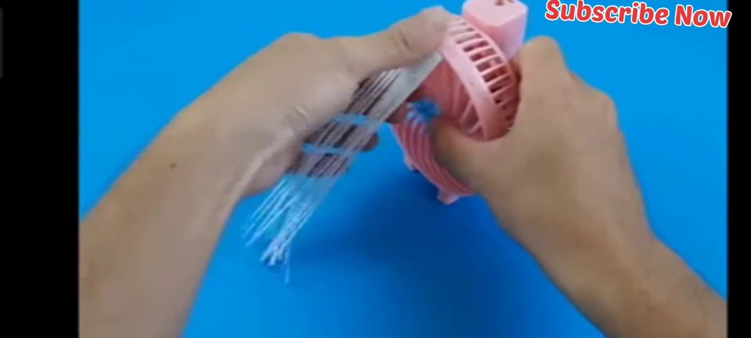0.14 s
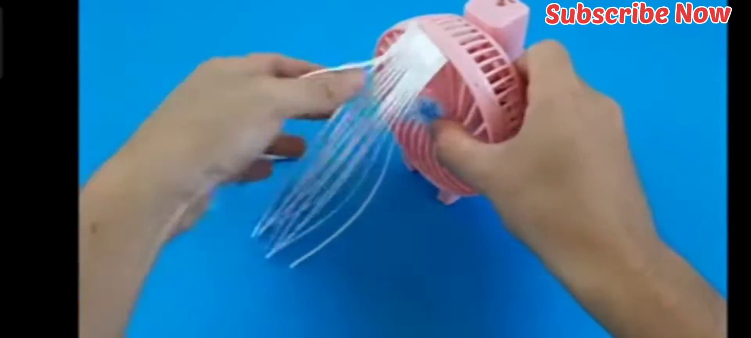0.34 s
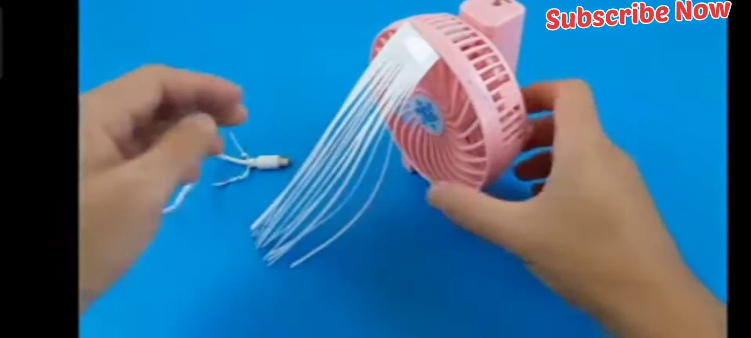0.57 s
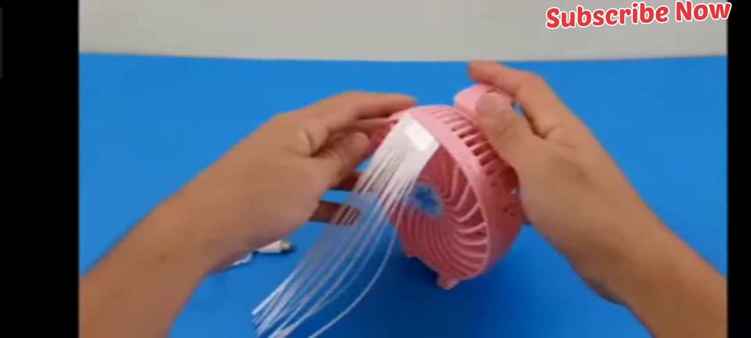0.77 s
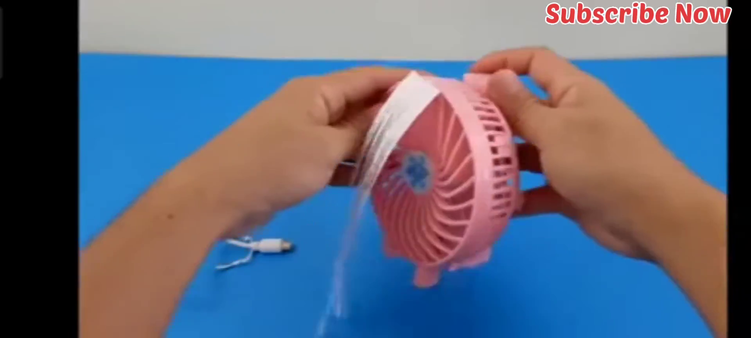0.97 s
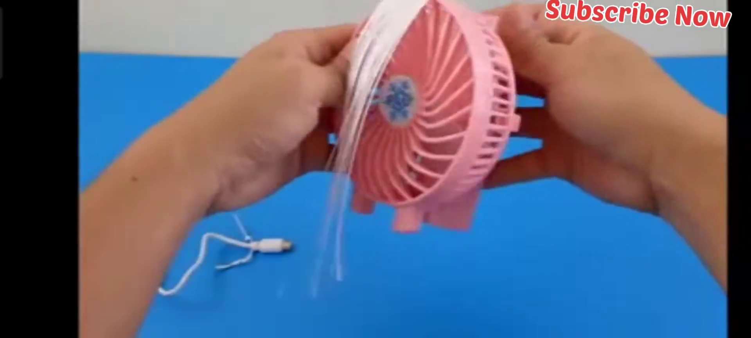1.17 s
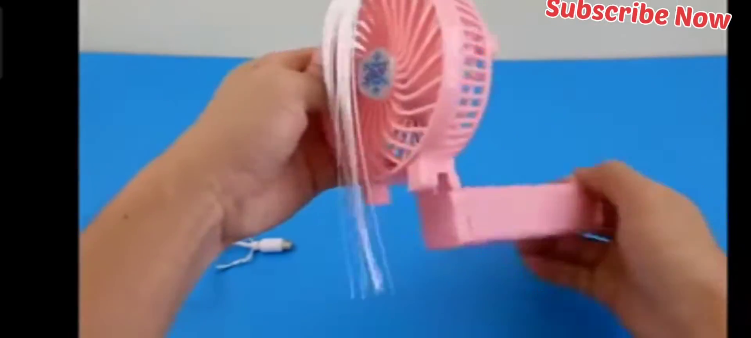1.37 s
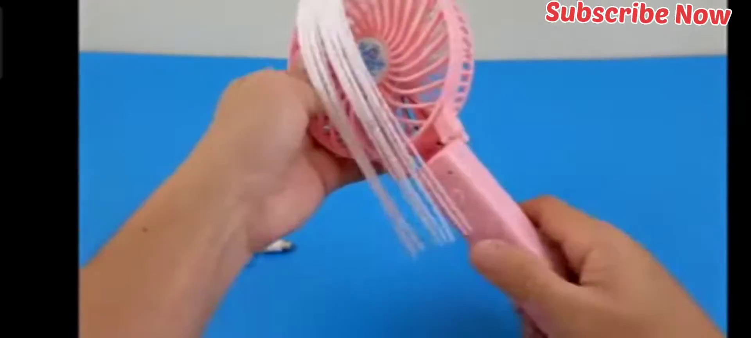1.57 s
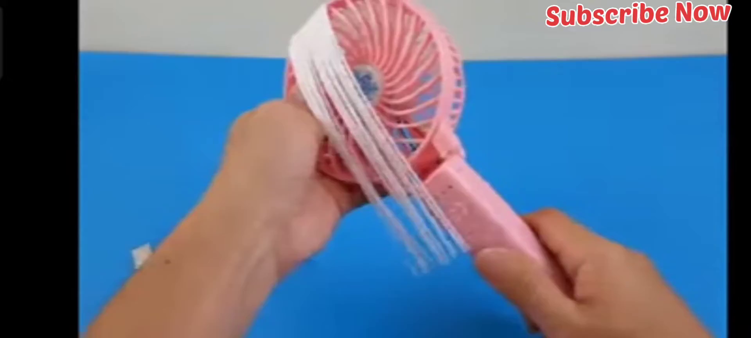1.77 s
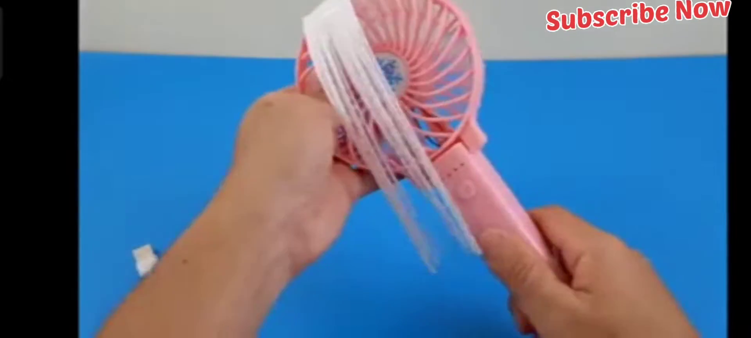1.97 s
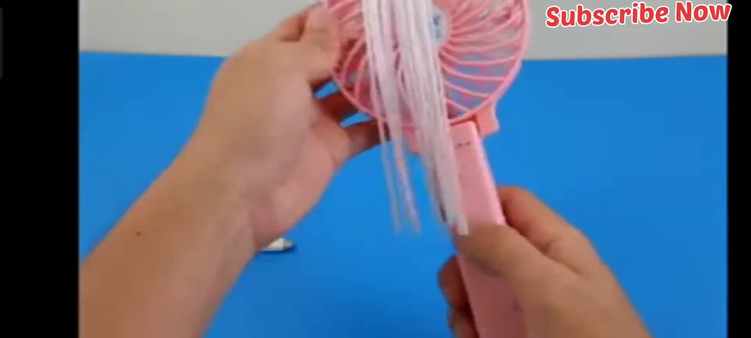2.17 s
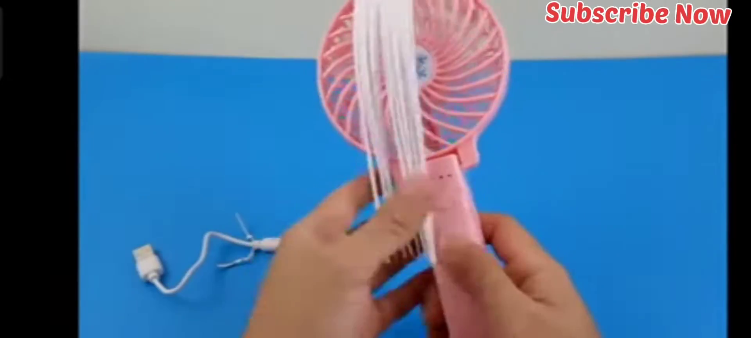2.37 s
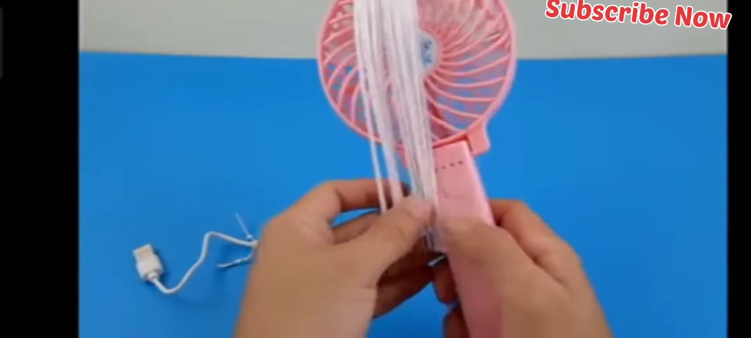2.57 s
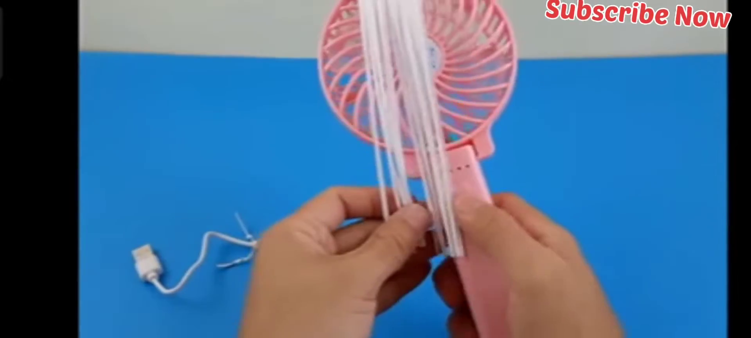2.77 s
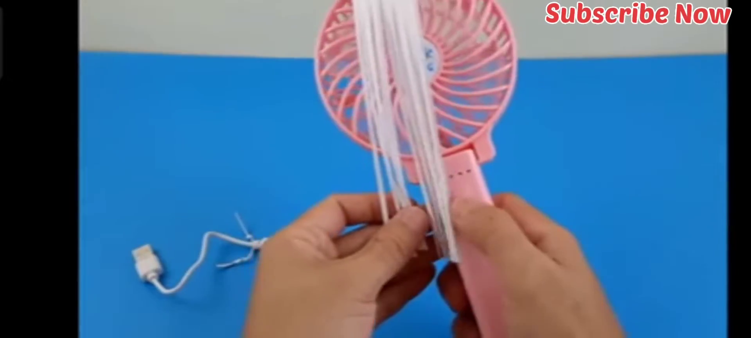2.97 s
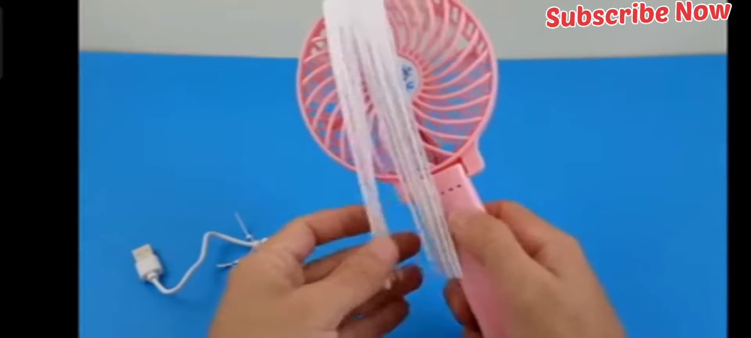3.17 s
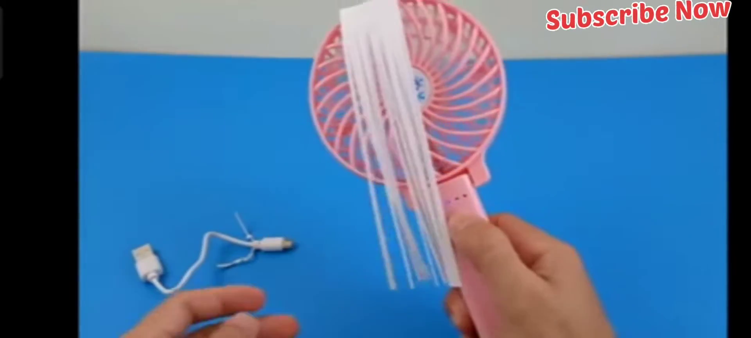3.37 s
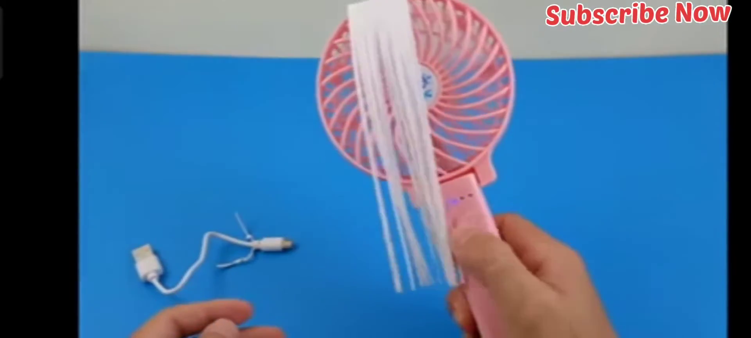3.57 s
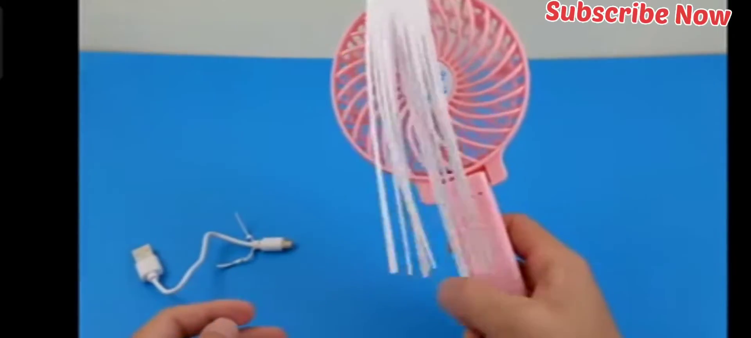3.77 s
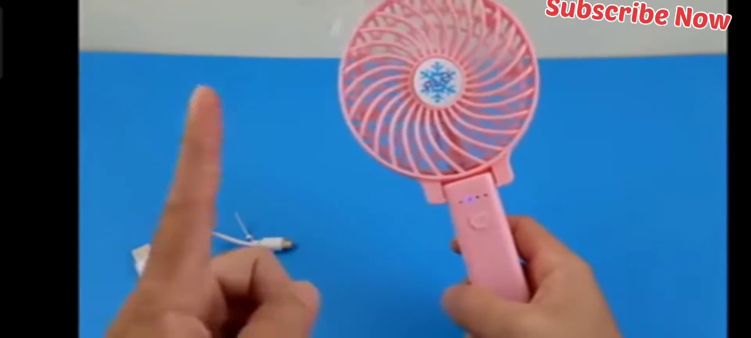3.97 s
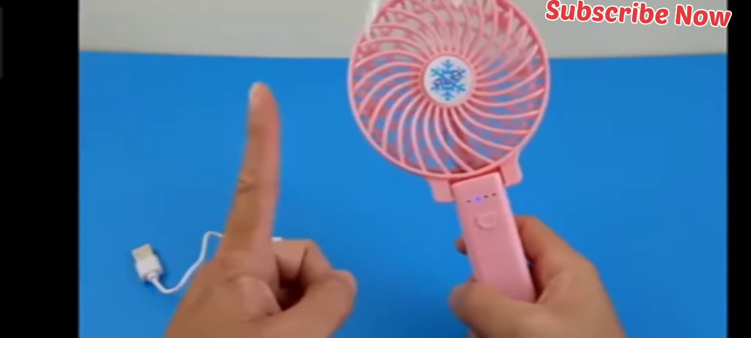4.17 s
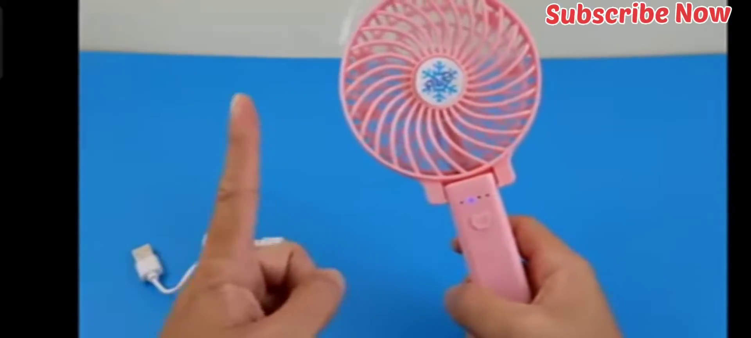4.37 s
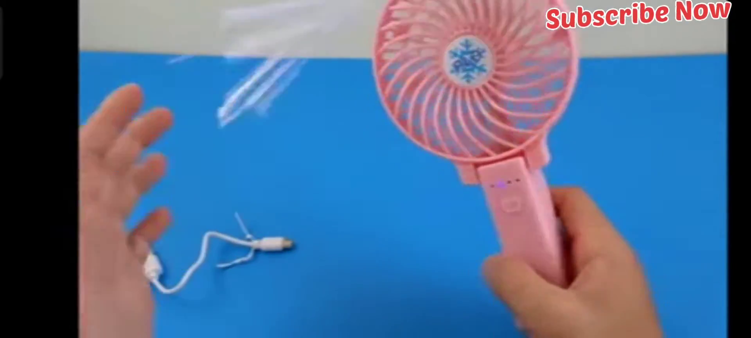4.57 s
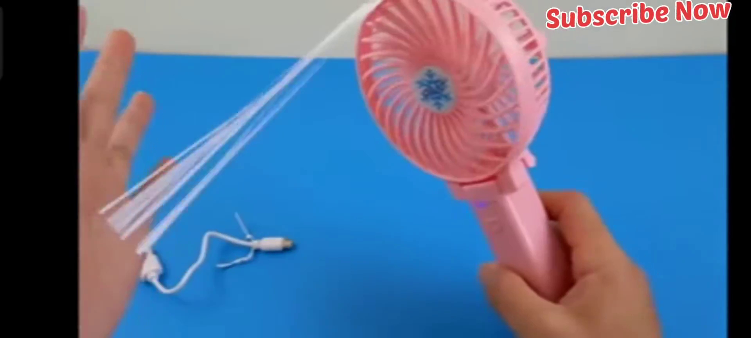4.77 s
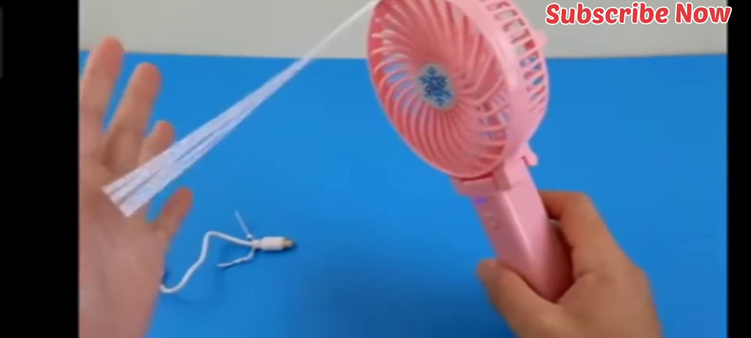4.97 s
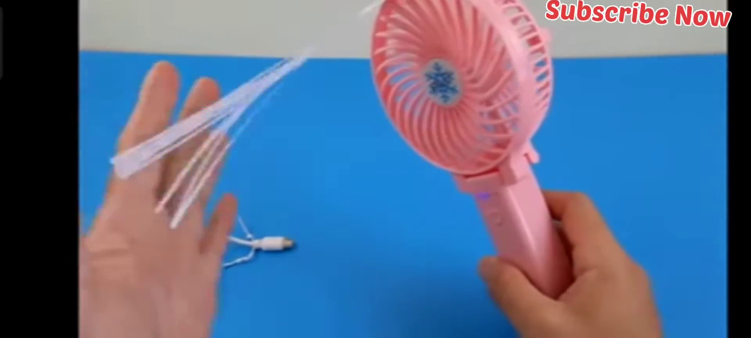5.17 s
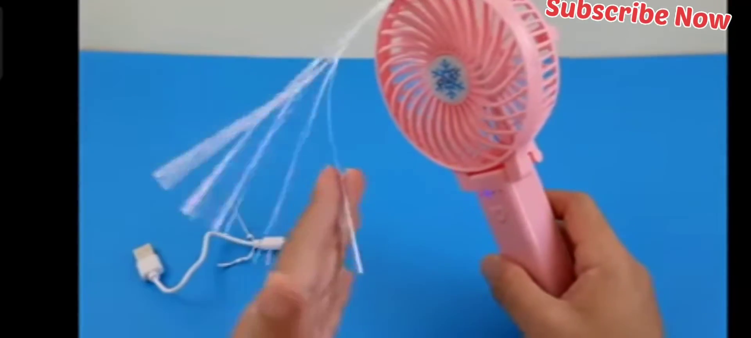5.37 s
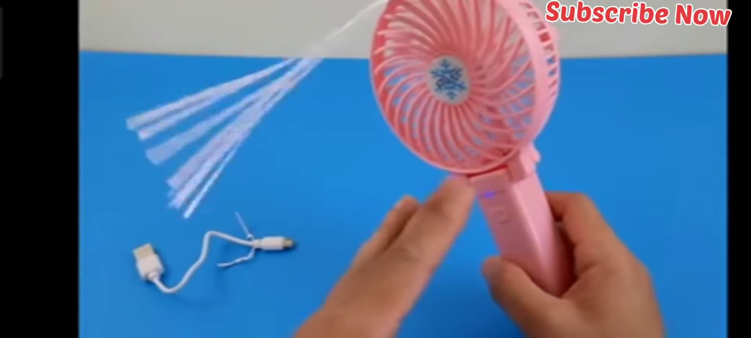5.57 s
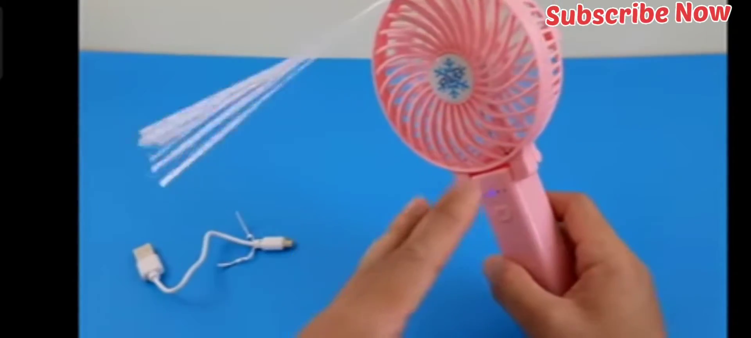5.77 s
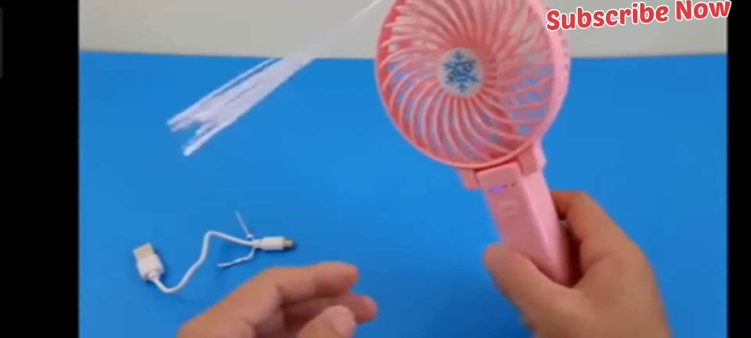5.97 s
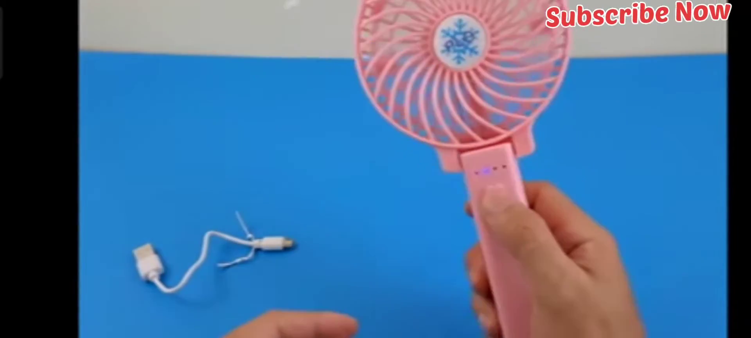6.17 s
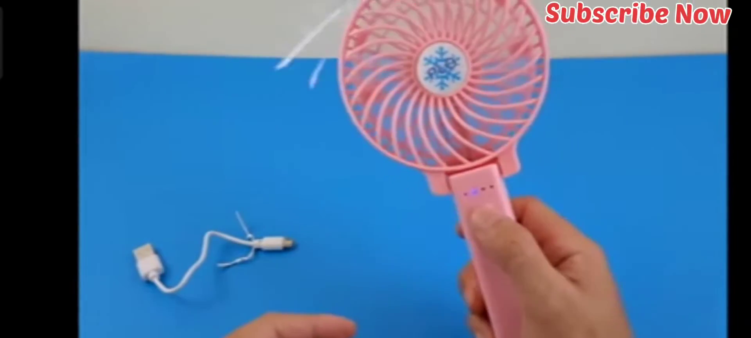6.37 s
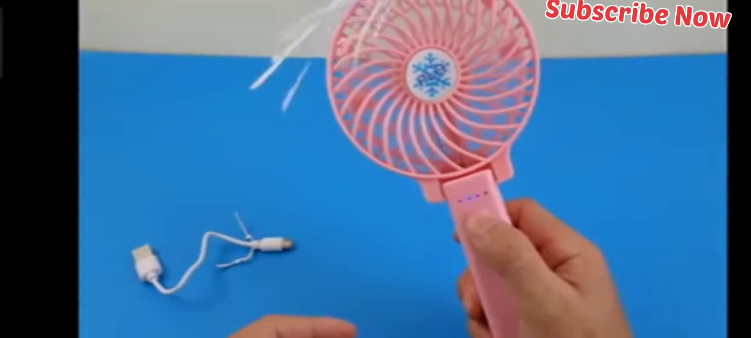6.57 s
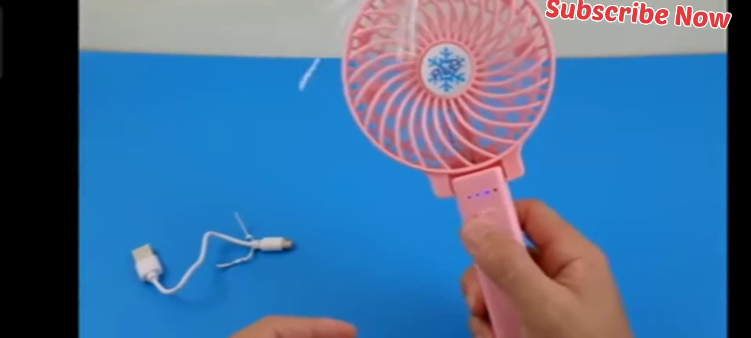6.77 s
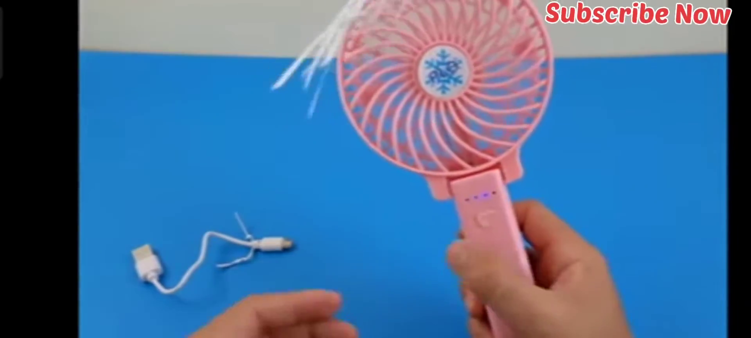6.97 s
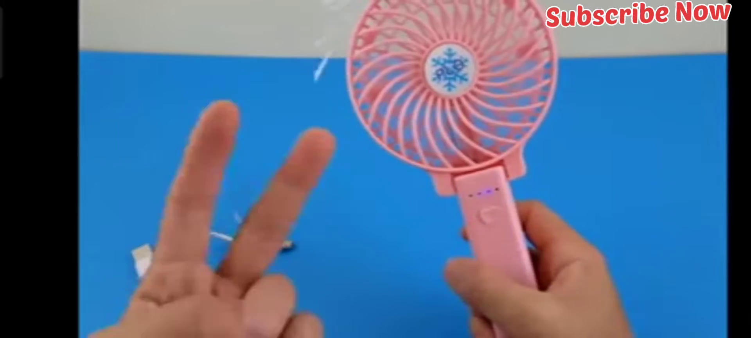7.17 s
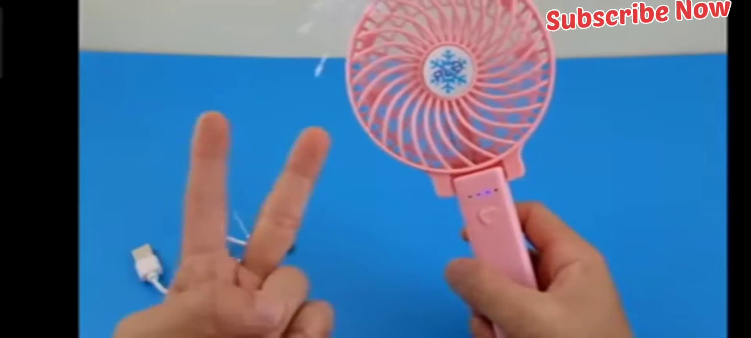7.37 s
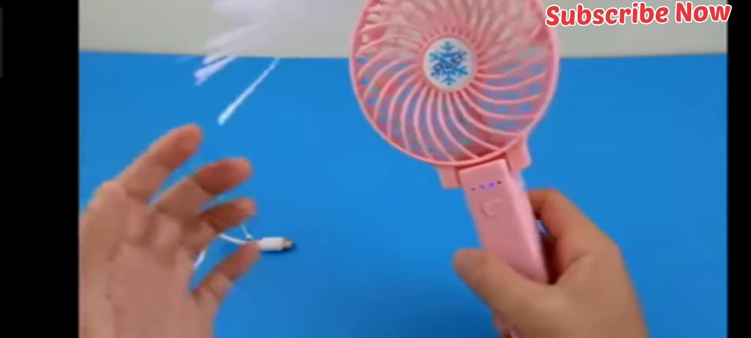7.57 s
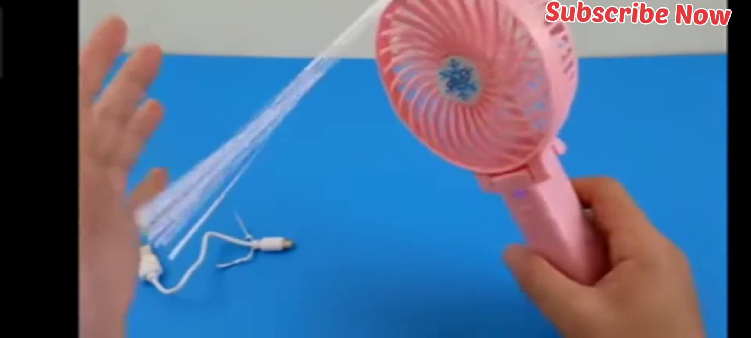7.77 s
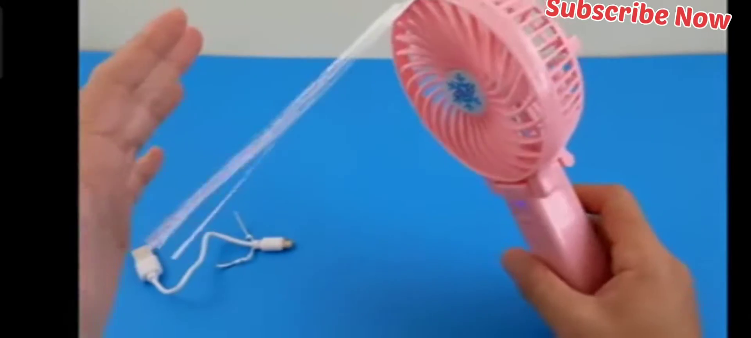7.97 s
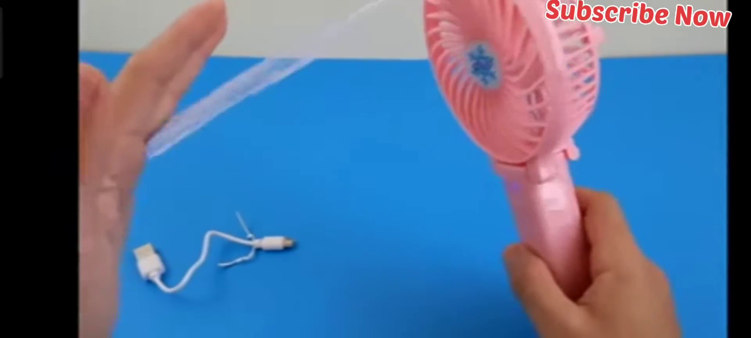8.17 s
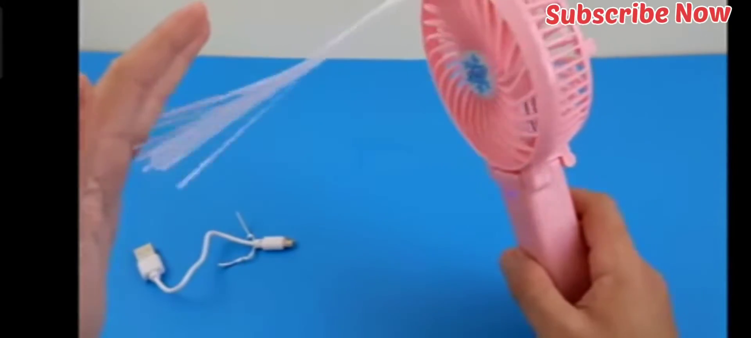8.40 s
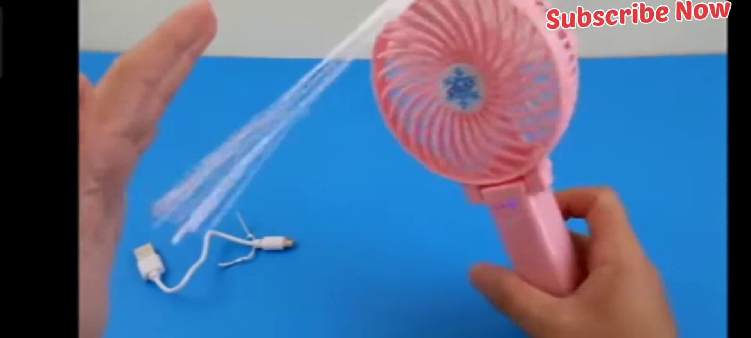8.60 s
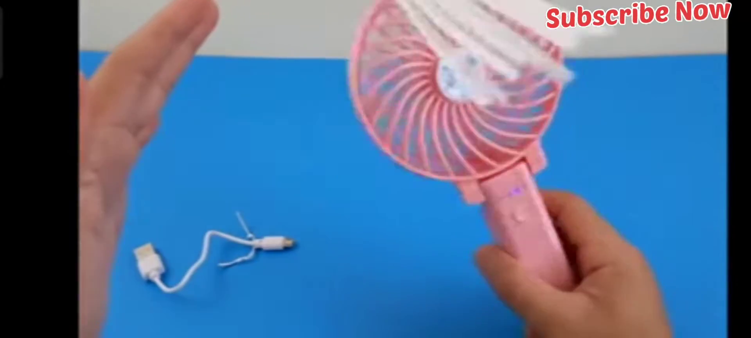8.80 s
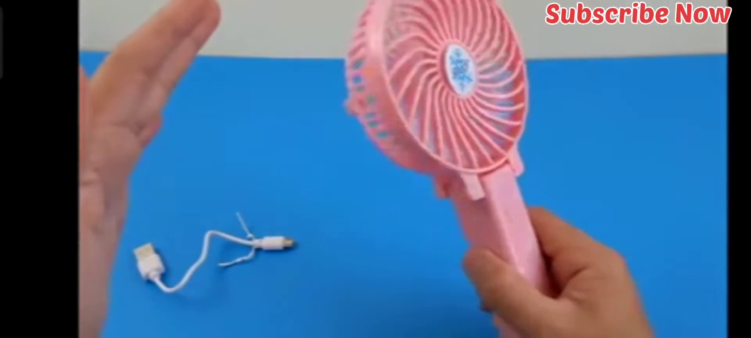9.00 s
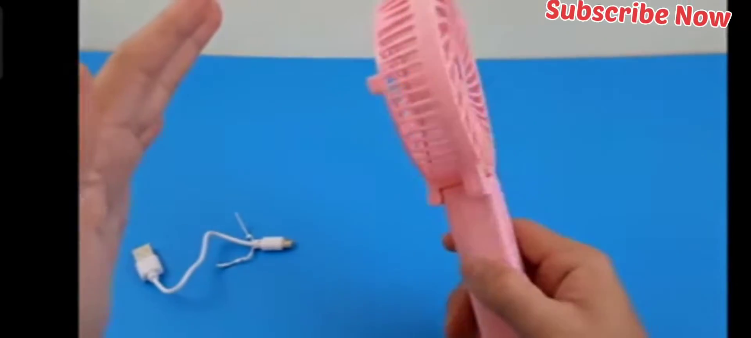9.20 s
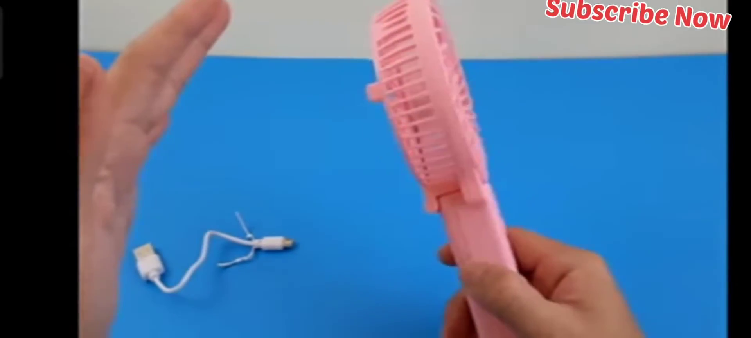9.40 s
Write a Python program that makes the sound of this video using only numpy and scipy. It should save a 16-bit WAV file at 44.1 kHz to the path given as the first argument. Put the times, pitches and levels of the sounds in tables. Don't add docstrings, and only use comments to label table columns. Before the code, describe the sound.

In a quiet room a small plastic handheld fan is handled, snapped open, switched on with a click, and whirs close up, then faster.

```python
import sys
import numpy as np
from scipy import signal
from scipy.fft import rfft, irfft, next_fast_len
from scipy.io import wavfile
from scipy.ndimage import uniform_filter1d, map_coordinates

SR = 44100
rng = np.random.default_rng(int(sys.argv[2]) if len(sys.argv) > 2 else 0)


def voltage_ratio(level):
    return 10 ** (np.asarray(level, float) / 20)


def unload_audio(sound):
    columns = np.transpose(np.atleast_2d(sound))
    steps = np.round(np.clip(columns, -1, 1) * 32767)
    wavfile.write(sys.argv[1], SR, steps.astype(np.int16))


N = 416304
BURST_SIZE = 8192

# start_s, gained_hz, settle_s
STEPS = [
    (3.37, 181.6, .312),
    (6.418, 22.6, .286),
]
# time_s, turned_aside_db, tipped_edge_on_db, motor_hidden_by_hub_db, motor_covered_db
POSE = [(3.9, 7, -5, 0, -6), (4.2, 2.5, -2.5, -6, -8), (4.42, 0, 3, -2.5, 1), (4.53, 4.5, -4.5, -5.5, -3),
        (4.72, 5.5, -1, 2.5, -4), (5.1, 1, 4, 2, 4), (6.3, -0.5, 6, 2, 1), (6.55, -1, 3, 2, 0.5),
        (7.0, -0.5, 4, 5, -1.5), (7.5, 4, -1, 6.5, 0), (7.7, 6, 0, 17, 15), (7.95, 7, 1, 12, 18),
        (8.05, 10.5, 2.5, 30, 21), (8.18, 10, 4, 20, 19), (8.3, 8, 5, 19, 16), (8.5, 5, -0.5, 14, 2.5),
        (8.7, 2, 6, 13, 4), (8.9, 1.5, 21.5, 21, 12), (9.15, 4, 27, 20, 12), (9.44, 3.5, 18.5, 28, 6)]
# multiple_of_blade_rate, slow_db, fast_db, share_of_turn_aside, share_of_tip
MULTIPLES = [(1, -42.5, -38, 0.5, 0.31), (2, -43.5, -36, 0.2, 0.79), (3, -39.5, -40.5, 0.95, 0.53),
             (4, -51, -52, 0.6, 0.43), (5, -59, -49.5, 2, 0.15), (8, -66, -65.5, 0.2, -.1),
             (10, -78, -68.5, .2, .5), (11, -67, -66, 0.1, 0.18), (13, -63.5, -61.5, 0.45, 0.2),
             (14, -65, -59.5, 0, 0.45), (15, -68.5, -61, .1, 0.55), (16, -70, -69, .2, .2)]
# multiple_of_blade_rate, slow_db, fast_db, share_of_cover
POLES = [(6, -60, -48, 0.97), (9, -69, -54, 0.84), (12, -76, -64, 0.39)]
# time_s, level_db
WAKING = [(3.45, -50.5), (3.53, -30), (3.65, -23), (3.73, -36), (3.8, -15), (3.9, -11), (4.1, -5.5),
          (4.3, -2), (5.0, 2)]
# pitch_hz, width_hz, level_db
GRILLE = [(1870, 220, 6.5), (2385, 166, 10.5), (2790, 220, 7.5), (3020, 140, 10), (3485, 290, 6),
          (4150, 170, -1), (4700, 170, -1.5), (5310, 180, -4), (5850, 200, -8.5), (7490, 200, -12)]
# pitch_hz, level_db per Hz
WHOOSH = [(90, -36), (150, -5.5), (300, 1.5), (600, 2.5), (1000, -4.5), (1250, 2), (1500, -7.5),
          (1800, -2.5), (2500, -13.5), (4000, -49)]
# pitch_hz, level_db per Hz
HISS = [(2530, -36), (4000, -0.5), (4420, -5), (4720, -3.5), (5400, -3.5), (6100, -7), (6600, -4),
        (7200, -5.5), (8300, -5.5), (10000, -7.5), (15000, -12), (16000, -15)]
# time_s, pitch_hz, level_db
SQUEAK = [(3.47, 6440, -84), (3.495, 6430, -69), (3.565, 6410, -63), (3.615, 6380, -66), (3.63, 6370, -74),
          (3.71, 6330, -74), (3.73, 6320, -90)]
# pitch_hz, width_hz, level_db, wakes_s
HOUSING = [(620, 200, 2, 3.47), (1890, 170, 2.5, 3.47), (2360, 200, 0, 3.57), (1250, 220, -3, 3.3)]
# start_s, peak_db, t60_s, first_blow over the rattle, damped_after_s
BLOWS = [
    (1.6653, -8, 0.055, 1.6, 0.011),
    (3.2694, -20.5, 0.033, 5.1, 0.007),
    (6.3886, -10.5, 0.012, 5.2, 0.0097),
]
LEAD_DB = (-20, -16, -27)
# pitch_hz, level_db per Hz
SNAP = [(120, -50), (200, -22.5), (380, -22), (510, -11), (620, -11), (800, -11), (1420, -8.5),
        (1810, -12.5), (2250, -24.5), (2600, -15), (4400, -17), (5520, -13), (9060, -11), (14600, -28.5),
        (16000, -35.5)]
# pitch_hz, level_db per Hz
FIRST = [(410, -50), (700, -21), (1840, -1), (2270, -6.5), (3690, -8.5), (4550, -14), (6920, -1.5),
         (7790, -16.5), (9600, -6), (12500, -29), (14200, -20.5), (16000, -39)]
# pitch_hz, level_db per Hz
SECOND = [(880, -49.5), (1500, -21), (2430, -14), (2830, -17), (3660, -12.5), (4050, -17), (5100, -14.5),
          (6500, -16.5), (6830, -10.5), (7480, 0), (7950, -15), (9000, -28), (9800, -24), (10400, -22.5),
          (16000, -42)]
# pitch_hz, level_db, t60_s
RING = [(1750, -35, 0.2), (1794, -32, 0.18), (820, -43, 0.14), (975, -42, 0.11)]
# start_s, peak_db, low_note_hz, bright_part_db
CLICKS = [(0.093, -45, 2600, 6), (.1062, -34.5, 5200, 1), (.1565, -42, 3100, 8), (.2214, -45, 4800, 7),
          (.7372, -43, 2990, 15), (.7557, -40.5, 5500, 7), (1.269, -51, 1267, -14), (1.472, -55, 4000, -10),
          (2.217, -53, 3500, -6), (2.5142, -52.5, 5500, 2.5), (2.6015, -55, 4950, -10),
          (5.372, -41.5, 9300, -3), (0.2923, -39.5, 1020, -4), (0.602, -43.5, 2530, -7.5),
          (1.2, -43, 5400, 0), (1.3024, -48, 1450, -15), (1.4157, -34.5, 1340, -19), (1.879, -39, 1340, 4),
          (1.896, -43, 1270, -9), (2.569, -48.5, 1256, -7), (3.39, -50, 957, -6.5),
          (8.377, -37.5, 2460, -0.5), (8.914, -43, 6800, -12)]
# start_s, then a list of pitch_hz, level_db, t60_s
KNOCKS = [
    (1.6653, [(505, -20, .05), (810, -16.5, 0.05), (1420, -16, .04), (1740, -16.5, .04), (2030, -21.5, .03)]),
    (1.6653, [(1050, -4.5, 0.0069)]),
    (3.2694, [(830, -49, 0.028), (1870, -40, .03), (2560, -41, .03), (6810, -42, .03), (9300, -44, .025)]),
    (6.3884, [(1650, -26, .02), (1890, -31, .025), (2450, -26, .03), (3700, -29.5, .022), (6850, -24, 0.021), (9850, -28, 0.017), (11000, -34, .018)]),
    (1.4152, [(780, -56, .07), (1085, -48.5, .04), (1417, -32, .035), (1880, -49.5, .05)]),
    (1.3, [(1247, -47, 0.023), (1750, -51, .03)]),
    (1.303, [(1450, -44.5, .025)]),
    (1.3135, [(1500, -50.5, .025)]),
    (1.324, [(1296, -54, .03)]),
    (1.2695, [(1306, -48.5, 0.038)]),
]
# start_s, length_s, pitch_hz, level_db
CHIRPS = [(0.091, .013, 2550, -55.5), (.085, .03, 3500, -60), (.116, .024, 3700, -60),
          (.154, .017, 3100, -58), (.178, .016, 4800, -61), (.217, .016, 4900, -61),
          (.218, 0.022, 1450, -65), (.219, .012, 7000, -55), (.255, 0.027, 560, -51), (.288, .03, 750, -54),
          (.305, .02, 333, -44), (0.23, .022, 320, -40), (.33, 0.038, 260, -47), (1.44, .035, 730, -65),
          (1.712, 0.024, 820, -47), (1.685, .025, 1000, -46), (1.68, .02, 540, -47),
          (1.745, 0.031, 1790, -52)]
# pitch_hz, level_db per Hz
TAIL = [(300, -20), (700, -6), (1200, -4), (1800, 0), (2200, -2.5), (3500, -9), (8000, -20.5)]
# pitch_hz, level_db per Hz
PAPER = [(1200, -43), (2200, -12.5), (2600, -5.5), (3000, -11), (3600, -5), (4200, -6), (5000, -1),
         (7000, -2), (9000, 1), (12000, -2), (16000, -11)]
# start_s, length_s, level_db, depth_below_4500_hz_db
RUSTLES = [(0.084, 0.023, -47, -2), (0.101, 0.017, -40.5, -2), (0.112, 0.04, -48.5, 0),
           (0.153, 0.019, -43.5, -4), (0.17, 0.017, -47.5, -2), (0.181, 0.039, -52, -5),
           (0.214, 0.046, -53, -8), (0.252, 0.12, -58.5, -4), (0.723, 0.058, -58, -13),
           (0.74, 0.057, -46.5, -8), (0.89, .045, -67, -12), (1.196, 0.052, -55.5, -10),
           (1.261, 0.025, -67.5, 17.5), (1.279, 0.12, -62.5, 7.5), (1.463, 0.03, -64, 4),
           (1.652, .018, -50.5, 13), (1.817, 0.061, -54.5, -15), (1.864, 0.077, -63.5, 13.5),
           (1.939, 0.064, -57, -4), (2.09, 0.061, -63, -3.5), (2.215, 0.05, -63.5, 3),
           (2.503, 0.046, -60.5, -7), (2.593, 0.014, -64.5, 0), (2.781, 0.051, -68, -8.5),
           (2.947, 0.21, -64.5, -10.5), (4.313, 0.03, -52.5, -20), (4.47, .03, -57, -20),
           (5.08, .05, -57, -20), (7.39, .02, -55, -15)]
# pitch_hz, level_db per Hz
SKIN = [(500, -28), (800, -6), (1100, -4.5), (1400, 2), (1900, -4.5), (2600, -10), (4000, -25)]
# start_s, length_s, level_db
DRAGS = [(.08, 0.32, -71.5), (.255, 0.1, -65), (.745, 0.057, -59), (1.261, 0.041, -62.5),
         (1.29, 0.048, -57.5), (1.33, 0.051, -66.5), (1.42, .06, -61.5), (1.647, 0.021, -53),
         (1.82, 0.18, -71)]
# start_s, length_s, pitch_hz, level_db
BOOMS = [(.25, 0.068, 135, -33.5), (.255, .05, 415, -50), (.29, .045, 204, -44), (.31, 0.068, 150, -43),
         (0.069, 0.15, 75.6, -46), (1.476, 0.18, 95.3, -48), (2.301, .3, 75.2, -49), (.44, 0.22, 125, -48),
         (.715, 0.033, 134, -39), (.76, 0.033, 150, -32.5), (5.12, 0.09, 143, -38), (5.68, .1, 139, -43),
         (8.15, 0.18, 160, -42)]
# start_s, length_s, level_db
THUDS = [(-.05, 0.36, -52), (.24, 0.094, -36), (.3, 0.088, -41), (.42, 0.2, -53), (.712, 0.046, -40.5),
         (.76, 0.043, -42), (1.62, 0.1, -44), (5.15, 0.38, -46), (5.66, 0.19, -47), (6.14, 0.12, -49.5),
         (7.12, 0.21, -50), (8.08, 0.34, -45.5), (8.42, 0.26, -51), (9.0, 0.22, -51)]
# pitch_hz, level_db per Hz
THUD = [(80, -24), (115, -3), (145, -1), (190, -7), (300, -16), (430, -22), (700, -36), (1400, -44),
        (3000, -63)]
# pitch_hz, level_db per Hz
RUMBLE = [(15, -30), (28, -2), (45, 4.5), (60, 5.5), (72, 7.5), (95, 2), (130, -41)]
# time_s, level_db
BUILDING = [(0, -44), (.5, -54), (.8, -49.5), (1.3, -51.5), (2.6, -47), (2.85, -53.5), (3.6, -47.5),
            (4.5, -54), (5.4, -44), (6.3, -46), (6.55, -48), (6.8, -45.5), (7.5, -49), (8.0, -47.5),
            (8.6, -46.5), (9.44, -54)]
# pitch_hz, level_db per Hz
QUIET = [(120, -30.5), (200, -4), (300, -18), (450, -31.5), (800, -30.5), (2600, -41), (4400, -46),
         (4900, -31.5), (7600, -35), (8200, -29), (10000, -28.5), (12500, -29), (16000, -28.5)]
# pitch_hz, t60_s
WALLS = [(300, 0.31), (2000, 0.27), (10000, 0.2)]


def speed():
    t = np.arange(N) / SR
    slow, fast = (1 - np.exp(-np.clip(t - s, 0, None) / lag) for s, _, lag in STEPS)
    swing = np.exp(-((t - 8.92) / 0.3) ** 2)
    rate = STEPS[0][1] * slow + STEPS[1][1] * fast - 2.9 * swing
    return rate, 20 * np.log10(slow + 1e-3), np.sqrt(fast)


def blades():
    rate, short, step = speed()
    aside, tip, hidden, covered = curves(POSE)
    turn = 2 * np.pi * np.cumsum(rate) / SR + 0.05 * wobble(12)
    whine_multiple = 7

    def line(k, db):
        shake = 0.15 if k == whine_multiple else 0.2 + 0.013 * k
        pull = -1 if k % 3 == 0 or k == whine_multiple else 1
        size_db = shake * (4.5 + 3 * (k < 3) * (1 - step)) * wobble(18)
        size_db = size_db + 2 * (k > 7) * wobble(3)
        return pull * voltage_ratio(db + size_db) * np.cos(k * turn + shake * wobble(25))

    def level(k, slow_db, fast_db):
        grows = 0.94 + 1.63 * min(k, 3)
        return slow_db + step * (fast_db - slow_db) + grows * short

    tones = np.zeros(N)
    for k, slow_db, fast_db, a, b in MULTIPLES:
        tones += line(k, level(k, slow_db, fast_db) - a * aside - b * tip)
    for k, slow_db, fast_db, c in POLES:
        tones += line(k, level(k, slow_db, fast_db) - c * covered)
    whine_db = -41 + step * 0.5 + curves(WAKING)[0] - hidden
    whine_db += (0.53 + 0.21 * np.clip(hidden, 0, 20)) * wobble(14)
    return np.sqrt(2) * (tones + line(whine_multiple, whine_db)), turn


def air(turn):
    _, short, step = speed()
    aside, tip, *_ = curves(POSE)

    def gain(slow_db, fast_db, grows, a, b):
        return voltage_ratio(slow_db + step * (fast_db - slow_db) + grows * short - a * aside - b * tip)

    chopped = (1 + 0.1 * np.cos(turn)) * rng.standard_normal(N)
    grille = patchy(filtered(chopped, modes(GRILLE)), depth_db=1.3, size=150)
    whoosh = rush(WHOOSH, grain_db=2.0, rate=40)
    body = gain(-50.5, -48, 8, 0.27, 0.3) * grille + gain(-43, -42.5, 4.5, 0.26, 0.31) * whoosh
    body *= voltage_ratio(0.69 * wobble(35))
    mid = filtered(body, lambda hz: np.exp(-(np.log((hz + 1) / 1450) / 0.5) ** 2))
    shade = voltage_ratio(-0.45 * aside) - 1

    hiss = patchy(rush(HISS, grain_db=1.5, rate=100), depth_db=1.2)
    hiss = patchy(hiss, depth_db=0.55, size=120)
    dull = filtered(hiss, lambda hz: 1 / (1 + (hz / 9000) ** 4))
    hiss = voltage_ratio(2 * step) * dull + voltage_ratio(-2 * step) * (hiss - dull)
    return body + shade * mid + gain(-56, -56, 7.5, -0.01, 0.24) * hiss


def bearing():
    t = np.arange(N) / SR
    hz, db = curves(SQUEAK)
    phase = 2 * np.pi * np.cumsum(hz + 90 * wobble(300) + 15 * wobble(30)) / SR
    squeak = np.sqrt(2) * voltage_ratio(db + 3 * wobble(90)) * np.sin(phase)
    white = rng.standard_normal(N)
    parts = [filtered(white, lambda f: modes([row[:3]])(f) ** 2) for row in HOUSING]
    waking = [np.clip((t - row[3]) / 0.08, 0, 1) for row in HOUSING]
    scrape = sum(part * wake for part, wake in zip(parts, waking)) / np.std(sum(parts))
    fade = np.interp(t, (4.2, 4.42), (1, 0))
    scrape_db = -62 + 5.0 * (t - 3.47) + 1.6 * wobble(14)
    return squeak + fade * voltage_ratio(scrape_db) * scrape


def clicks():
    out = np.zeros(N)
    for (s, db, t60, knock, damped), colour, lead_db in zip(BLOWS, (SNAP, FIRST, SECOND), LEAD_DB):
        out -= voltage_ratio(db) * burst(s, t60, lambda hz: voltage_ratio(along(colour, hz)), knock, damped, lead_db)

    latch_s, latch_db = BLOWS[0][:2]
    bounce = burst(latch_s + 0.021, 0.05, lambda hz: voltage_ratio(along(SNAP, hz)), knock=0.8)
    out += voltage_ratio(latch_db - 19.5) * bounce
    t = np.clip(np.arange(N) / SR - latch_s, 0, None)
    for hz, db, t60 in RING:
        size = voltage_ratio(db - 60 * t / t60 + 3 * wobble(60)) * (t > 0)
        out += size * np.sin(2 * np.pi * hz * t + 1.3 * wobble(150))

    for s, db, low_hz, bright_db in CLICKS:
        low = modes([(low_hz, 0.34 * low_hz, 0)])
        high = modes([(8240, 5000, bright_db - 0.5)])
        hit = burst(s, 0.022, lambda hz: low(hz) ** 2 + high(hz) ** 2 / voltage_ratio(bright_db), knock=8.96)
        out += voltage_ratio(db + 4.5) * hit
    return out


def knocks():
    out = np.zeros(N)
    t = np.arange(BURST_SIZE // 2) / SR
    rise = 1 - np.exp(-t / 0.00036)
    for s, table in KNOCKS:
        ring = np.zeros(len(t))
        for k, (hz, db, t60) in enumerate(table):
            ring += (-1) ** k * voltage_ratio(db - 60 * t / t60) * np.sin(2 * np.pi * hz * t)
        out[round(s * SR):][:len(t)] -= rise * ring
    return out


def chirps():
    t = np.arange(N) / SR
    size, drift = voltage_ratio(2.6 * wobble(250)), 1.1 * wobble(200)
    after = t - BLOWS[0][0]
    rattle_size = (after > 0) * voltage_ratio(-35.5 - 60 * np.abs(after) / 0.22)
    out = rattle_size * rush(TAIL, grain_db=3, rate=90)
    for s, length, hz, db in CHIRPS:
        out += size * swells([(s, length, db + 2)]) * np.sin(2 * np.pi * hz * t + drift)
    return out


def hands():
    paper = swells([(s, length, db) for s, length, db, _ in RUSTLES])
    deep = swells([(s, length, db + deep_db) for s, length, db, deep_db in RUSTLES])
    rustle = patchy(crackle(PAPER, per_second=1500, share=0.6), depth_db=3.2)
    low = filtered(rustle, lambda hz: 1 / (1 + (hz / 4500) ** 6))
    skin = swells(DRAGS) * rush(SKIN, grain_db=3.5, rate=120)
    return paper * (rustle - low) + deep * low + skin


def booms():
    t = np.arange(N) / SR
    drift = 0.5 * wobble(30)
    out = np.zeros(N)
    for s, length, hz, db in BOOMS:
        out += swells([(s, length, db)]) * np.sin(2 * np.pi * hz * (t - s) + drift)
    return np.sqrt(2) * out


def room():
    _, short, step = speed()
    murmur = voltage_ratio(-55.5) + voltage_ratio(-55.5 + 4.5 * short + 1.6 * wobble(7.9))
    grip = (murmur + swells(THUDS)) * even(rush(THUD), 0.149)
    rumble = voltage_ratio(curves(BUILDING)[0] + 0.5 + 1.93 * wobble(7.7)) * even(rush(RUMBLE), 0.13)
    still = patchy(rush(QUIET, grain_db=2.0, rate=35), depth_db=3.5)
    return rumble + grip + voltage_ratio(-59 - 2 * step) * still


def walls(x):
    hz, t, z = signal.stft(rng.standard_normal(SR // 2), SR, nperseg=256)
    fade = voltage_ratio(-60 * t / along(WALLS, hz)[:, None])
    tail = signal.istft(z * fade, SR, nperseg=256)[1]
    delayed = np.pad(x, (750, 0))
    return signal.fftconvolve(delayed, tail / np.linalg.norm(tail))[:N]


def burst(s, t60, colour, knock=3.5, damped=0.1, lead_db=-14.5):
    t = (np.arange(BURST_SIZE // 2) - 140) / SR
    rattle = voltage_ratio(-60 * t / t60 - 13 * (t > damped))
    force = np.where(t < 0, voltage_ratio(lead_db + 1600 * t), rattle) * rng.standard_normal(len(t))
    force += knock * (t == 0)
    push = rfft(force, BURST_SIZE)
    push = push / uniform_filter1d(np.abs(push), 90)
    y = irfft(push * causal(colour(np.fft.rfftfreq(BURST_SIZE, 1 / SR))))[:len(t)]
    out = np.zeros(N + BURST_SIZE)
    out[round((s + t[0]) * SR):][:len(t)] = y / np.abs(y).max()
    return out[:N]


def causal(gain):
    fold = irfft(np.log(np.abs(gain) + 1e-6))
    fold[1:BURST_SIZE // 2] *= 2
    fold[BURST_SIZE // 2 + 1:] = 0
    return np.exp(rfft(fold))


def modes(table):
    def response(f):
        total = 0
        for k, (c, w, db) in enumerate(table):
            total = total + (-1) ** k * voltage_ratio(db) * 1j * f * w / (c * c - f * f + 1j * f * w)
        return total
    return response


def crackle(spectrum, per_second, share):
    snaps = (rng.random(N) < per_second / SR) * rng.standard_normal(N)
    snaps = unit(filtered(snaps, lambda hz: voltage_ratio(along(spectrum, hz))))
    return unit(share * snaps + rush(spectrum, grain_db=3.5, rate=200))


def rush(spectrum, grain_db=0, rate=300):
    white = rng.standard_normal(N) * voltage_ratio(grain_db * wobble(rate))
    return unit(filtered(white, lambda hz: voltage_ratio(along(spectrum, hz))))


def patchy(x, depth_db, size=5):
    z = signal.stft(x, nperseg=256)[2]
    field = uniform_filter1d(rng.standard_normal(z.shape), size=4 if size < 20 else 2, axis=0)
    field = uniform_filter1d(field, size=size, axis=1)
    return unit(signal.istft(z * voltage_ratio(depth_db * unit(field)), nperseg=256)[1][:N])


def even(x, span):
    return unit(x / np.sqrt(np.abs(uniform_filter1d(x ** 2, int(span * SR))) + 0.045))


def swells(rows):
    t = np.arange(N) / SR
    return sum(voltage_ratio(db) * np.sin(np.pi * np.clip((t - s) / length, 0, 1) ** 0.8) for s, length, db in rows)


def wobble(rate):
    knots = rng.standard_normal(int(N * rate / SR) + 4)
    return map_coordinates(knots, [np.arange(N) * rate / SR])


def curves(rows):
    s, *cols = np.transpose(rows)
    return [np.interp(np.arange(N) / SR, s, c) for c in cols]


def along(points, hz):
    f, v = np.transpose(points)
    return np.interp(np.log(hz + 1), np.log(f + 1), v)


def filtered(x, response):
    m = next_fast_len(N + SR // 2)
    return irfft(rfft(x, m) * response(np.fft.rfftfreq(m, 1 / SR)), m)[..., :N]


def unit(x):
    return x / np.sqrt(np.mean(x ** 2) + 1e-20)


def scene():
    tone, turn = blades()
    wind = air(turn) + bearing()
    hits = clicks() + knocks()
    touch = hands() + chirps()
    mono = tone + wind + hits + touch + booms() + room() + voltage_ratio(-18.5) * walls(hits)
    return np.array([mono, mono])


def top_cut(x):
    return signal.sosfilt(signal.butter(12, 16480, fs=SR, output="sos"), x)


def record(dry):
    treble = filtered(dry[0], lambda hz: hz > 3800)
    level = np.sqrt(np.abs(uniform_filter1d(treble ** 2, 1024)))
    odd = voltage_ratio(-15) * level ** 2 / (level + 0.006) * rng.standard_normal(N)
    odd = filtered(odd, lambda hz: (hz > 3980) * 9000 / (hz + 3000))
    mix = filtered(dry + [odd, -odd], lambda hz: hz < 15745)
    return top_cut(mix)


dry = scene()
out = record(dry)
unload_audio(out)
```